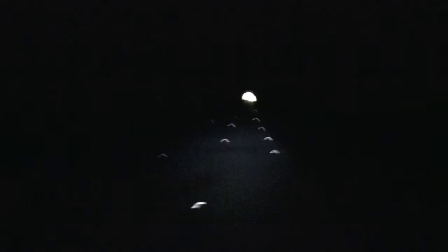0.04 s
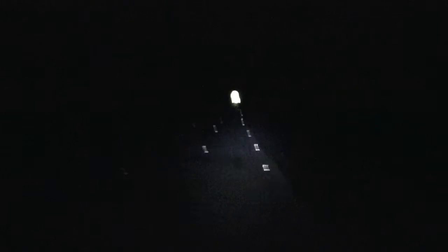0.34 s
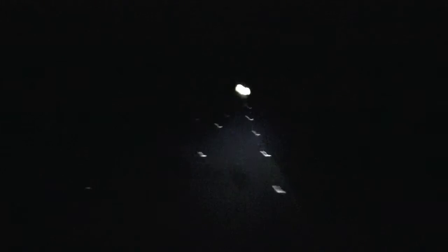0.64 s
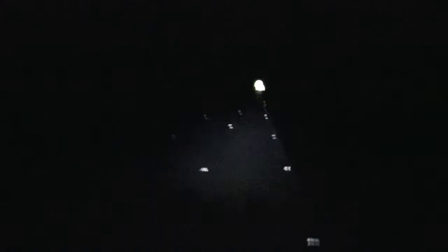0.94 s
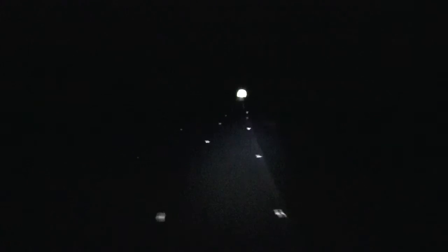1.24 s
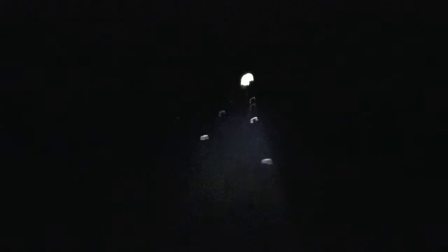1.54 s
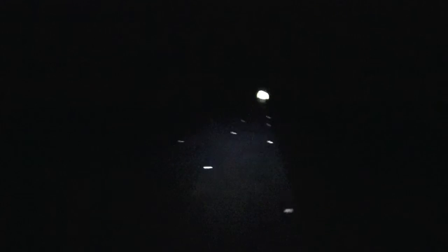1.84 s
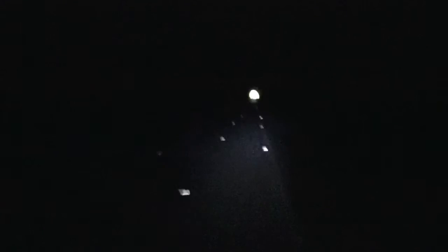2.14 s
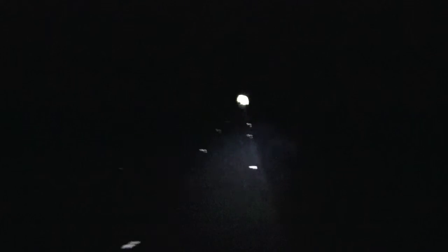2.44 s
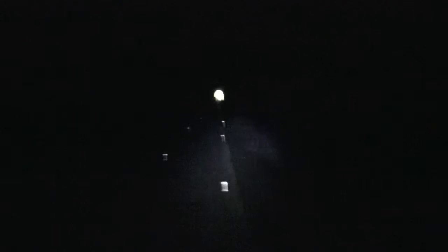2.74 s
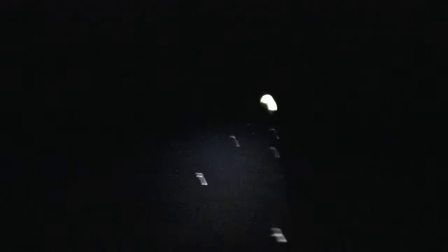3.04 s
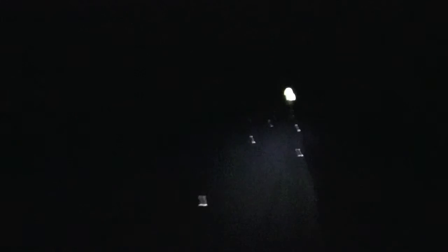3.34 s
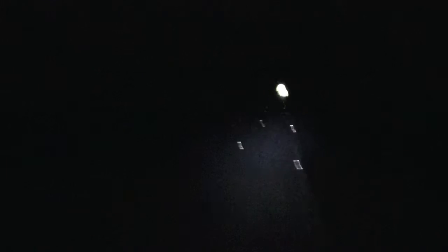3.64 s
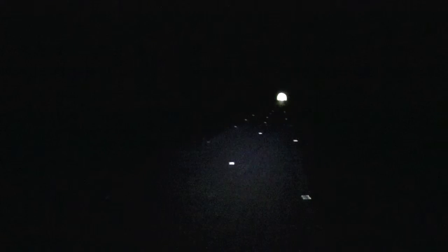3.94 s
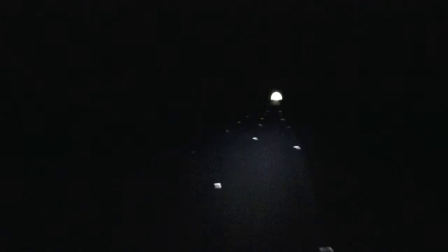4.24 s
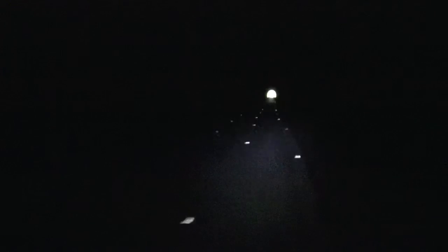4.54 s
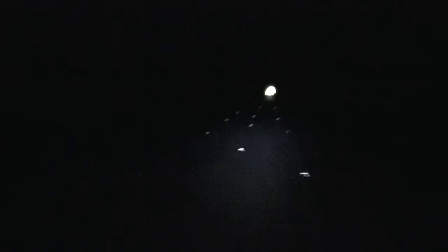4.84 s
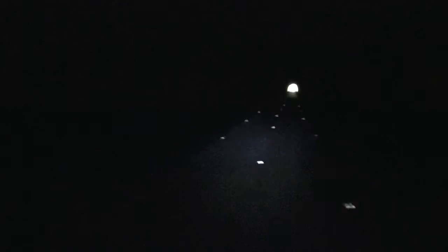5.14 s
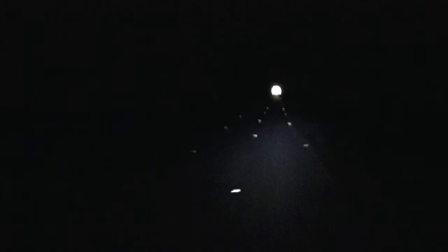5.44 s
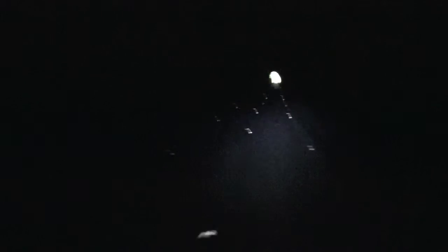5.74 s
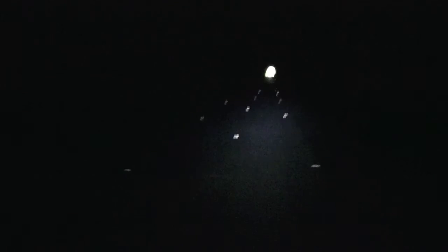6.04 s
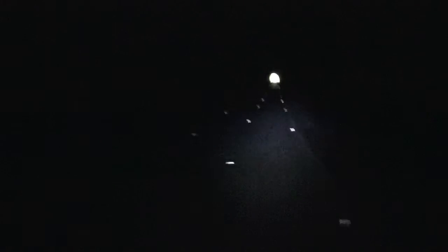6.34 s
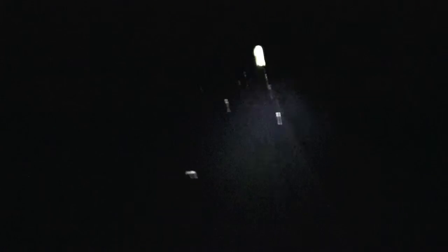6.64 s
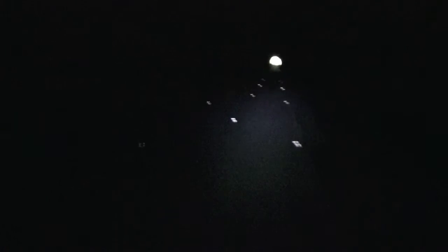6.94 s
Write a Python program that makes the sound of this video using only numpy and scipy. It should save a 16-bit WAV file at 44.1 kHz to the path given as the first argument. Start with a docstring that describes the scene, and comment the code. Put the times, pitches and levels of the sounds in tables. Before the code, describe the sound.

A bicycle rolls through a long tunnel, heard from the handlebar. The tyres give a throbbing hum over a steady road roar and low rumble, while grit ticks and pings. Bumps thump and rattle the microphone's mount, and two hard jolts knock through the frame and briefly overload it. Afterwards the hum sinks into the echo, and the ride continues over sizzling sand, small stones and a few lighter bumps.

```python
"""A bicycle rolls through a long tunnel with a camera on its handlebar. From the start both treads
hum, throbbing with each wheel turn, in a road roar that swells with the pedalling; grit ticks off
the tyres. Bumps rock the camera and rattle its mount, hardest near 2.3 and 3.2 s, where they knock
through the frame and overload the microphone. From about 4 s the hum sinks into the tunnel's echo,
and the ride goes on over sand, stones and a few lighter bumps."""
import sys
import numpy as np
from scipy import signal
from scipy.fft import rfft, irfft
from scipy.io import wavfile

SR = 44100
rng = np.random.default_rng(int(sys.argv[2]) if len(sys.argv) > 2 else 0)


def output_pcm(signal):
    """Save a mono or channel-first signal as 16-bit PCM at the path in sys.argv[1].

    Samples are clipped to [-1, 1] before scaling.
    """
    pcm = np.clip(np.atleast_2d(signal).T, -1, 1) * 32767
    wavfile.write(sys.argv[1], SR, np.round(pcm).astype(np.int16))


N = 308700
TIME = np.arange(N) / SR

# Coarseness of the road surface. Each row: time in seconds, base level of the roar in dB.
ROAD = [(0.0, -34.5), (0.35, -34.5), (0.84, -34.5), (1.87, -32.5), (2.26, -34), (3.1, -33.5), (3.33, -34),
        (3.9, -33.5), (4.37, -34.5), (5.09, -33), (5.3, -35.5), (7.0, -33.5)]


def gain_of(db):
    """Decibels to amplitude."""
    return 10 ** (np.asarray(db) / 20)


def unit_rms(x):
    """Scales to rms 1."""
    return x / np.sqrt(np.mean(x ** 2) + 1e-20)


def value_at(points, hz):
    """Reads a curve on a log-frequency axis."""
    f, value = np.transpose(points)
    return np.interp(np.log(hz + 1), np.log(f + 1), value)


def curves(rows):
    """One value per sample for each column of a timed table."""
    s, *columns = np.transpose(rows)
    return [np.interp(TIME, s, c) for c in columns]


def swells(rows):
    """Envelope of a series of bell-shaped swells."""
    return sum(gain_of(db) * np.exp(-((TIME - s) / half) ** 2) for s, half, db in rows)


def add(mix, s, sound):
    """Mixes a sound in at s seconds."""
    part = mix[round(s * SR):][:len(sound)]
    part += sound[:len(part)]


def wander(rate):
    """Smooth random drift of rms 1 that changes about rate times a second."""
    hz = np.fft.rfftfreq(N, 1 / SR)
    return unit_rms(irfft(rfft(rng.standard_normal(N)) * np.exp(-.5 * (hz / rate) ** 2), N))


def stereo(a, b, likeness):
    """Two unrelated signals become left and right with the given likeness."""
    mid, side = np.sqrt((1 + likeness) / 2) * a, np.sqrt((1 - likeness) / 2) * b
    return np.array([mid + side, mid - side])


def noise(spectrum, peaks=()):
    """Stereo noise of rms 1 with the given colour and resonances."""
    # Stereo image, widest in the mids. Each row: frequency in Hz, left-right likeness (1 is mono).
    image = [(30, 0.92), (120, 0.9), (250, 0.68), (500, 0.8), (1100, 0.68), (2300, 0.72), (4500, 0.75),
             (8000, 0.93), (14000, 1)]
    hz = np.fft.rfftfreq(N, 1 / SR)
    a, b = rfft(rng.standard_normal((2, N)))
    resonance_db = sum(db * np.exp(-2 * ((hz - f) / width) ** 2) for f, width, db in peaks)
    colour = gain_of(value_at(spectrum, hz) + resonance_db)
    return unit_rms(irfft(stereo(a, b, value_at(image, hz)) * colour, N))


def patter(spectrum, per_s):
    """Many tiny random impacts of the given colour; rms 1."""
    hits = rng.standard_normal(N) * (rng.random(N) < per_s / SR)
    colour = gain_of(value_at(spectrum, np.fft.rfftfreq(N, 1 / SR)))
    return unit_rms(irfft(rfft(hits) * colour, N))


def strike(modes, contact_s, pitch=1):
    """A brief scraping contact rings modes that swell for an instant and die; peak 1."""
    t = TIME[:2048]
    force = rng.standard_normal(len(t)) * np.exp(-t / contact_s)
    sound = np.zeros(len(t))
    for hz, width, db in modes:
        ring = t * np.exp(-np.pi * width * t) * np.sin(2 * np.pi * hz * pitch * t)
        sound += gain_of(db) * unit_rms(signal.fftconvolve(force, ring)[:len(t)])
    return sound / abs(sound).max()


def rebounding(hits, modes, contact_s, within_s, scatter):
    """Each hit is followed by three weaker rebounds at chance moments, slightly scattered in pitch."""
    out = np.zeros(N)
    for s, db in hits:
        delays, pitches = rng.random(3), 1 + scatter * (rng.random(4) - .5)
        add(out, s, gain_of(db) * strike(modes, contact_s, pitches[0]))
        for delay, pitch in zip(delays, pitches[1:]):
            rebound_db = db - 15 - 3.2 * delay
            add(out, s + within_s * delay, gain_of(rebound_db) * strike(modes, contact_s, pitch))
    return out


def tunnel(x, wet_db):
    """Direct sound plus the tunnel's diffuse tail, which hangs on longest in the bass."""
    # Decay of the tunnel. Each row: frequency in Hz, time to fall 60 dB in seconds.
    decay = [(200, 2.7), (1000, 0.23), (4000, 0.86), (8000, 0.24), (11000, 0.067), (15000, 0.16)]
    hz, t, bands = signal.stft(rng.standard_normal((2, 2 * SR)), SR, nperseg=256)
    fade = gain_of(-60 * t / value_at(decay, hz)[:, None])
    tail = signal.istft(bands * fade, SR, nperseg=256)[1]
    tail = stereo(*tail, likeness=0.48) * (1 - np.exp(-TIME[:tail.shape[1]] / 0.00073))
    tail /= np.linalg.norm(tail[0])
    return x + gain_of(wet_db) * signal.fftconvolve(x[None], tail, axes=1)[:, :N]


def echoed_tone(cycles, spread_hz):
    """A tone that arrives over many moving paths, each with its own Doppler shift."""
    phase = 2 * np.pi * cycles
    return unit_rms(wander(spread_hz) * np.cos(phase) + wander(spread_hz) * np.sin(phase))


def drone():
    """A faint, smeared tone grows, then holds."""
    hz, full_db, rise_db_per_s, full_s = 508, -46, 3, 4.4
    level_db = full_db - rise_db_per_s * np.maximum(full_s - TIME, 0)
    return gain_of(level_db) * echoed_tone(hz * TIME, spread_hz=25)


def rumble():
    """Frame and wind rumble, heavier on coarse road and a touch louder toward the end."""
    # Low-end colour. Each row: frequency in Hz, relative level in dB.
    colour = [(10, -35), (25, -7), (45, -2), (70, 0), (110, 0), (150, -5.5), (200, -10.5), (280, -15.5),
              (450, -19), (1000, -79)]
    road_db, = curves(ROAD)
    coarse_db = 0.69 * (road_db - road_db.mean())
    rise_db = 0.19 * (TIME - TIME.mean())
    return gain_of(-23 + coarse_db + rise_db + 1.66 * wander(7.2)) * noise(colour)


def road_roar():
    """Road noise fills the tunnel and swells as each pedal stroke presses the tyre down harder."""
    # Colour of the roar. Each row: frequency in Hz, relative level in dB.
    colour = [(150, 1.5), (420, -13), (570, 1.5), (800, 3), (980, -1.5), (1400, -4.5), (1950, -11),
              (2700, -7.5), (3400, -11), (4500, -17.5), (6200, -41), (9000, -51), (15000, -53)]
    # Resonances of tyre and contact patch. Each row: centre in Hz, width in Hz, lift in dB.
    resonances = [(1156, 138, 7), (1780, 210, 4.5), (2258, 350, 7.5)]
    pedal_hz, swell_db, first_top_s = 1.94, 0.5, 0.43
    road_db, = curves(ROAD)
    pedal_db = swell_db * np.cos(2 * np.pi * pedal_hz * (TIME - first_top_s))
    return gain_of(road_db + pedal_db + .5 * wander(31)) * noise(colour, resonances)


def tyre_hiss():
    """Rubber peels off the road in a flickering hiss, with dust ticking underneath."""
    # Colour of hiss and dust. Each row: frequency in Hz, relative level in dB.
    colour = [(2500, -25), (5000, 3), (6500, -1), (7800, 2), (8900, -5), (11000, -9.5), (13000, -13),
              (15500, -19)]
    # The hiss rises and eases unevenly along the ride. Each row: time in seconds, level in dB.
    fader = [(0, -48.5), (.12, -54.5), (.3, -50.5), (.55, -50.5), (.68, -52), (.87, -50.5), (1.15, -52.5),
             (1.5, -48.5), (1.7, -51), (2.15, -51), (2.45, -49.5), (3.1, -51), (3.28, -52), (3.58, -47),
             (3.73, -52.5), (3.86, -48), (4.3, -53), (4.5, -49.5), (4.75, -50.5), (5.15, -50),
             (5.33, -53.5), (5.58, -49), (5.8, -52.5), (6.03, -48), (6.33, -53.5), (6.55, -49), (7, -50)]
    hiss_db, = curves(fader)
    flicker_db = .4 * wander(7) + 1.2 * wander(120)
    return gain_of(hiss_db + flicker_db) * (noise(colour) + gain_of(-10.5) * patter(colour, per_s=230))


def sand():
    """The tyres sizzle over sandy patches and spray fine sand against the bicycle."""
    # Patches and sprays. Each row: centre in seconds, half length in seconds, level in dB.
    patches = [(0.985, 0.17, -42), (1.55, 0.25, -44), (4.1, .12, -45), (5.05, 0.13, -46), (6.75, .15, -53)]
    sprays = [(.24, 0.044, -50), (1.55, 0.028, -53), (3.61, 0.046, -48), (4.485, 0.086, -46),
              (4.67, .04, -59)]
    # Their colours. Each row: frequency in Hz, relative level in dB.
    sizzle_colour = [(1000, -40), (1900, -10), (2400, 4), (3300, -2), (4200, -11), (6500, -40),
                     (15000, -44)]
    spray_colour = [(2000, -29), (4000, 11), (6000, -3), (8000, 2), (10800, -4), (12500, -6), (15500, -17)]
    sizzle = swells(patches) * noise(sizzle_colour)
    spray = swells(sprays) * patter(spray_colour, per_s=6200)
    return sizzle + tunnel(spray, wet_db=-16)


def grit():
    """Stones ping off the bicycle, ricochet and ring on in the tunnel, among many finer grains."""
    # Larger grit flung off the tyres. Each row: start in seconds, relative peak in dB.
    hits = [(.2045, -31), (.2255, -38), (.3795, -45), (1.257, -30.5), (1.366, -43), (1.41, -40),
            (1.5195, -27.5), (1.564, -57), (2.483, -38), (2.833, -41), (3.44, -43), (3.568, -36),
            (3.784, -37), (3.908, -44), (4.342, -43), (4.384, -36), (4.4266, -33), (4.448, -35),
            (4.47, -27.5), (4.491, -37), (4.522, -43), (4.597, -43), (4.6405, -29.5), (4.96, -38),
            (5.701, -43), (5.83, -40), (5.956, -39), (6.045, -44), (6.439, -43), (6.5863, -32.5),
            (6.6724, -30.5), (6.7145, -44), (6.9632, -34)]
    # Modes of a ping. Each row: frequency in Hz, width in Hz, relative level in dB.
    modes = [(3160, 1600, 1.5), (6100, 1600, 0.5), (8040, 1200, 1), (10550, 2300, 1), (11370, 2200, -3),
             (14400, 6100, -8)]
    stones = gain_of(5.5) * rebounding(hits, modes, contact_s=0.0035, within_s=0.12, scatter=0.14)
    grains = np.zeros(N)
    for when, size, pitch in rng.random(size=(130, 3)):
        ping = strike(modes, contact_s=0.0015, pitch=0.56 + .45 * pitch)
        add(grains, when * N / SR, gain_of(-54 + 9 * size ** 2) * ping)
    return tunnel(stones + grains, wet_db=-7)


def stone_snaps():
    """A stone pinched out by the tyre gives one broad click, and the tunnel answers."""
    # Each row: start in seconds, dry peak in dB, tilt of the colour in dB per octave.
    snaps = [(.2045, -21, 2), (.5123, -24, 3), (2.5712, -25, 4), (2.9305, -23, 0), (2.9625, -26, -2),
             (3.0435, -29, 4), (3.0692, -17, -4), (5.5133, -26, 4), (5.8262, -17.5, -1.5)]
    # Colour of a click. Each row: frequency in Hz, relative level in dB.
    colour = [(30, -60), (500, -25), (1500, -4), (2800, 3), (4200, -1), (7000, -9), (11000, -19),
              (15500, -24.5)]
    out, hz = np.zeros(N), abs(np.fft.fftfreq(1024, 1 / SR))
    for s, db, tilt in snaps:
        log_gain = np.log(gain_of(value_at(colour, hz) + tilt * np.log2(np.maximum(hz, 500))))
        # minimum phase packs the energy into the attack
        click = np.fft.ifft(np.exp(np.conj(signal.hilbert(log_gain)))).real
        add(out, s, gain_of(db) * click / abs(click).max())
    return tunnel(out, wet_db=-3.5)


def mount_creaks():
    """Under strain the mount creaks in tiny, bright slips right at the microphone."""
    # Each row: start in seconds, length in seconds, level in dB.
    creaks = [(1.66, 0.014, -44), (1.779, 0.0092, -41), (1.871, .012, -44), (2.28, 0.034, -44),
              (2.319, 0.011, -34), (2.349, .006, -36), (2.37, 0.041, -47), (2.703, 0.023, -44),
              (2.726, 0.034, -44), (3.09, .008, -47), (3.113, 0.066, -40.5), (3.149, 0.0084, -32),
              (3.158, 0.043, -41), (3.2, .009, -45)]
    # Colour of the slips. Each row: frequency in Hz, relative level in dB.
    colour = [(700, -10), (1500, -11), (2600, -21), (3500, 4), (5400, 0), (6200, 0), (7600, 3.5),
              (8700, 1.5), (9600, -8), (12000, -13), (15500, -13)]
    strain = np.zeros(N)
    for s, length, db in creaks:
        add(strain, s, gain_of(db) * np.sin(np.pi * np.arange(0, 1, 1 / (length * SR))))
    return strain * patter(colour, per_s=7000)


def mount_rattles():
    """Bumps clink the mount's metal bracket, a little differently at each microphone port."""
    # Each row: start in seconds, relative peak in dB.
    clinks = [(.49, -28), (1.6, -24), (1.618, -41), (1.8072, -23), (1.819, -28), (1.877, -34),
              (2.2058, -22.5), (2.219, -23), (2.3183, -22.5), (2.3272, -19), (2.388, -29), (2.3985, -22),
              (2.7442, -21.5), (3.158, -25), (3.1852, -20), (3.2108, -22), (5.467, -26)]
    # Modes of the bracket. Each row: frequency in Hz, width in Hz, relative level in dB.
    modes = [(1060, 360, 5), (4020, 460, 8.5), (5300, 310, 0), (7260, 910, 0.5), (8400, 730, -5),
             (10000, 500, -9), (12000, 800, -17)]
    mid, side = [rebounding(clinks, modes, contact_s=0.00086, within_s=.018, scatter=0.035)
                 for _ in range(2)]
    return stereo(mid, side, likeness=.85)


def loose_fittings():
    """Loose fittings clack on the frame and chatter through the hardest jolt."""
    # Each row: start in seconds, dry peak in dB, pitch factor.
    clacks = [(2.3208, -19, 0.73), (2.388, -22, 0.59), (2.3518, -9.5, 0.36), (2.7042, -14, 0.45),
              (2.786, -21, .4), (3.1057, -3.5, 0.97), (3.1233, -15, 0.85), (3.134, -16, 1.0),
              (3.1358, -12.5, 1.1), (3.1535, -9.5, 0.78), (3.155, -8, .68), (3.177, -20, 0.53),
              (6.965, -26, 1.9)]
    # Modes of a fitting. Each row: frequency in Hz at factor 1, width in Hz, relative level in dB.
    modes = [(1600, 650, 9), (2334, 630, 17.5), (2850, 900, 4), (4060, 1000, -13)]
    # Bursts of chatter. Each row: centre in seconds, half length in seconds, level in dB.
    bursts = [(3.11, .005, -31.5), (3.132, 0.012, -33), (3.155, 0.0067, -31), (3.178, .006, -39)]
    # Colour of the chatter. Each row: frequency in Hz, relative level in dB.
    colour = [(50, -70), (700, -22), (1400, -7), (2400, 6), (3100, -3), (4500, -14), (9000, -30)]
    out = np.zeros(N)
    for s, db, pitch in clacks:
        add(out, s, gain_of(db) * strike(modes, contact_s=0.0003, pitch=pitch))
    return tunnel(out + swells(bursts) * patter(colour, per_s=1600), wet_db=-12)


def frame_knocks():
    """In the hardest jolts the wheel knocks through to the frame: a dead, woody blow."""
    # Each row: start in seconds, peak in dB.
    knocks = [(2.3255, -5), (2.3337, -5.5), (2.339, -4.5), (3.1539, -4.5), (3.1637, -0.5), (3.168, -4.5),
              (3.1896, 3)]
    # Broad, low modes of the frame. Each row: frequency in Hz, width in Hz, relative level in dB.
    modes = [(283, 125, 15), (520, 540, -16), (850, 540, -23)]
    out, t = np.zeros(N), TIME[:SR // 20]
    blow = sum(gain_of(db) * np.exp(-np.pi * width * t) * np.sin(2 * np.pi * hz * t)
               for hz, width, db in modes)
    blow *= 1 - np.exp(-t / 0.00049)
    for s, db in knocks:
        add(out, s, gain_of(db) * blow / abs(blow).max())
    return out


def camera_twists():
    """The landing camera shudders and twangs, pushing one microphone port in and the other out."""
    # Twists in the mount. Each row: centre in seconds, half length in seconds, level in dB.
    twists = [(1.619, .008, -20), (2.229, .011, -11), (2.327, .005, -18), (2.348, .009, -7),
              (2.414, 0.0084, -5), (2.759, 0.0098, -7), (3.159, 0.0051, -4), (3.179, 0.01, -7),
              (3.205, .008, -15), (3.23, .008, -8), (3.641, .01, -22)]
    # Shudder at the ports. Each row: frequency in Hz, relative level in dB.
    shudder = [(15, -17), (48, 2), (75, 14), (130, 13), (300, -12), (600, -22), (1000, -28), (2000, -47),
               (5000, -77)]
    # Each row: start in seconds, level in dB, pitch in Hz, time to fall 60 dB in seconds.
    twangs = [(1.612, -38, 1060, .05), (2.338, -24, 1060, .04), (2.4092, -14.5, 1060, 0.042),
              (2.753, -15, 1060, .05), (3.1055, -25, 1150, .04), (3.1523, 0.5, 606, 0.027),
              (3.175, -21, 1060, .04), (3.223, -17, 1060, .05)]
    twist, t = swells(twists) * noise(shudder)[0], TIME[:SR // 8]
    attack = 1 - np.exp(-t / 0.00057)
    for s, db, hz, t60 in twangs:
        add(twist, s, attack * gain_of(db - 60 * t / t60) * np.sin(2 * np.pi * hz * t))
    return np.array([twist, -twist])


def road_bumps():
    """Each bump rocks the camera through a swing or two; harder bumps rock it faster."""
    # Each row: start in seconds, envelope peak in dB.
    bumps = [(0.183, -11), (.489, -8.5), (1.353, -12), (1.597, -7), (1.647, -8), (1.689, -8.5), (1.808, 3),
             (2.193, -7.5), (2.2175, 0.5), (2.3, -3), (2.3302, 12), (2.38, -6), (2.401, 5), (2.613, -8.5),
             (2.745, 3), (3.1396, -2), (3.1603, 13.5), (3.179, 5), (3.1889, 5), (3.211, 4.5), (3.629, -5.5),
             (3.932, -12), (3.952, -7.5), (4.56, -16), (5.464, -3), (6.061, -10.5), (6.338, -11.5)]
    rock_hz, hz_per_db = 97, 4
    out, t = np.zeros(N), TIME[:SR // 4]
    for s, db in bumps:
        hz = rock_hz + hz_per_db * db
        cycles = 1.936 * np.log1p(hz * t / 1.957)  # the swing slows as it dies
        age = cycles / 0.52
        envelope = (age * np.exp(1 - age)) ** 1.7
        add(out, s, gain_of(db) * envelope * np.sin(2 * np.pi * cycles))
    return out


def tyre_hum():
    """Two treads of slightly different pitch beat inside their echo and throb as the wheels turn."""
    # Riding speed. Each row: time in seconds, tread blocks meeting the road per second.
    speed = [(0, 352.5), (1.15, 352), (1.65, 350), (2.1, 353), (3.75, 356.2), (4.1, 358.7), (4.6, 364.5),
             (5.8, 365), (7, 370)]
    # The hum sinks into its echo. Each row: time in seconds, base level in dB,
    # direct sound over echo in dB, rear tread against front in dB.
    balance = [(0, -24, 11, -12), (1.9, -25.5, 9, -10), (3.75, -25, 6, -9), (4.2, -30, 0, -6),
               (5.4, -29.5, -1, -5), (7, -31.5, -5, -3)]
    # Brief dips in the hum. Each row: centre in seconds, half length in seconds, depth in dB.
    dips = [(1.424, 0.023, 7), (1.757, 0.014, 15), (2.31, 0.083, 6.5), (2.72, 0.067, 1),
            (3.105, 0.048, 9.5), (3.52, 0.056, 6.5)]
    # The tyre runs out of true. Each row: throbs per turn, depth in dB, crest as a share of a turn.
    throbs = [(1, 3, 0.19), (2, 2, 0.4), (3, 1.2, 0.515)]
    # Tread overtones. Each row: harmonic number, base level in dB, Doppler spread in Hz.
    overtones = [(2, -40.3, 7), (3, -45.7, 7.5), (4, -57, 16)]
    # Fader on the overtones. Each row: time in seconds, lift in dB.
    overtone_lift = [(0, 2), (.2, -7), (.65, 4), (1.3, 4.5), (1.9, 1.5), (2.5, -3), (3.2, -.5), (3.8, 0),
                     (4.25, -4), (4.6, -1), (5.5, -3), (6.3, -1), (7, .5)]
    blocks_per_turn, rear_pitch, rear_overtone_db = 108, .943, -8.5
    tread_hz, = curves(speed)
    hum_db, direct_db, rear_db = curves(balance)
    lift_db, = curves(overtone_lift)

    wheel_turns = np.cumsum(tread_hz) / SR / blocks_per_turn
    throb_db = sum(db * np.cos(2 * np.pi * k * (wheel_turns - crest)) for k, db, crest in throbs)
    dip_db = sum(db * np.exp(-((TIME - s) / half) ** 2) for s, half, db in dips)
    flutter_db = 1.7 * (.5 - abs(wander(5.5)))
    level = gain_of(hum_db - dip_db + throb_db + flutter_db)

    front_cycles = np.cumsum(tread_hz * (1 + 0.002194 * wander(3.39))) / SR
    rear_cycles = front_cycles * rear_pitch
    far = 1 / np.sqrt(1 + gain_of(direct_db) ** 2)  # near and far share a constant power
    near = gain_of(direct_db) * far
    direct = unit_rms(np.sin(2 * np.pi * front_cycles))
    echo = stereo(*[echoed_tone(front_cycles, spread_hz=11) for _ in range(2)], likeness=0.88)
    rear = gain_of(rear_db) * echoed_tone(rear_cycles, spread_hz=6.6)
    out = level * (near * direct + far * unit_rms(echo) + rear)

    for k, db, spread in overtones:
        cycles = k * front_cycles * 1.008  # echoes from ahead come back slightly sharp
        mid, side = [near * echoed_tone(cycles, spread) + far * echoed_tone(cycles, spread_hz=14)
                     for _ in range(2)]
        rear = gain_of(rear_overtone_db) * echoed_tone(k * rear_cycles, spread)
        out += gain_of(db + lift_db) * (stereo(mid, side, likeness=0.5) + rear)
    return out


def scene():
    """The mix at the handlebar; hum, roar, drone and rumble lean slightly left."""
    hum_pan, bed_pan = gain_of([[.45], [-.45]]), gain_of([[.55], [-.55]])
    hum = hum_pan * tyre_hum()
    rolling = bed_pan * (road_roar() + drone()) + tyre_hiss() + bed_pan * rumble() + sand()
    jolts = road_bumps() + camera_twists() + frame_knocks()
    hardware = mount_rattles() + loose_fittings() + mount_creaks()
    return hum + rolling + jolts + hardware + grit() + stone_snaps()


def record(dry):
    """The microphone overloads with a rounded knee, dulls the top octave and cuts off above it."""
    ceiling, knee, dull_hz, edge_hz = .94, 5, 13800, 15700
    clipped = dry / (1 + abs(dry / ceiling) ** knee) ** (1 / knee)
    dulled = signal.sosfilt(signal.butter(2, dull_hz, fs=SR, output="sos"), clipped)
    band_limit = signal.firwin(511, edge_hz, window=("kaiser", 9), fs=SR)
    return signal.oaconvolve(dulled, band_limit[None], "same")


dry = scene()
out = record(dry)
output_pcm(out)
```